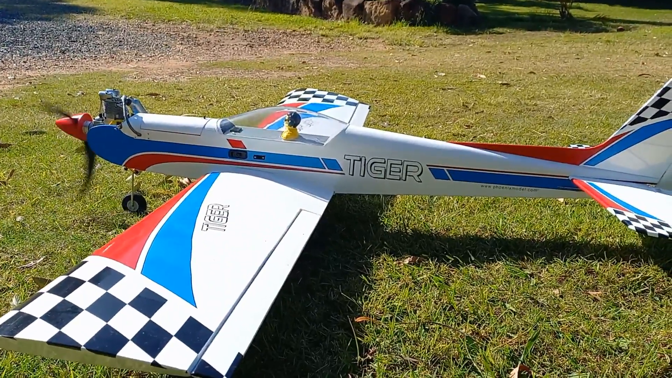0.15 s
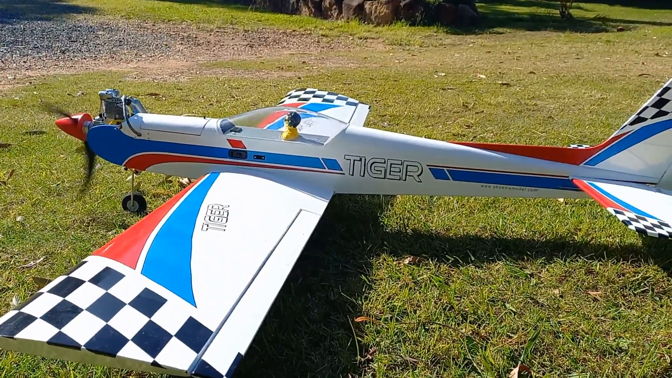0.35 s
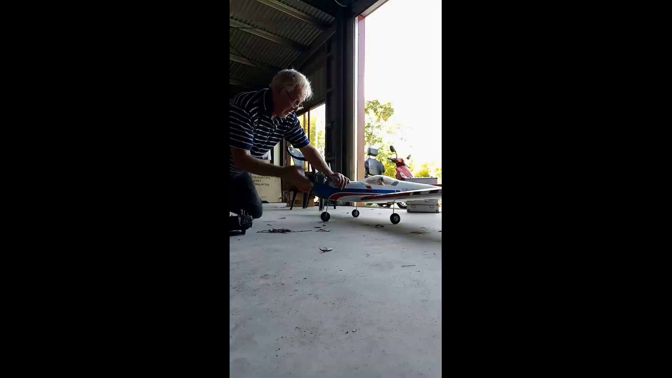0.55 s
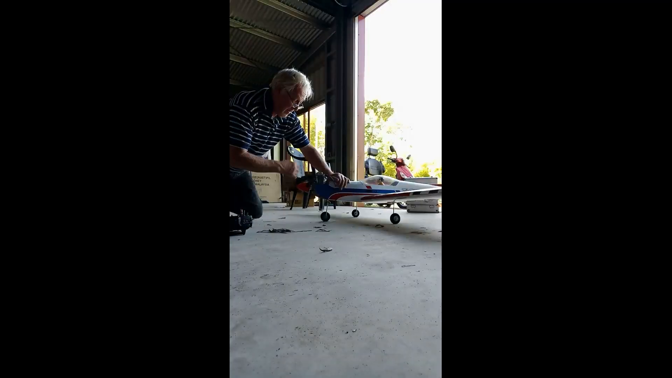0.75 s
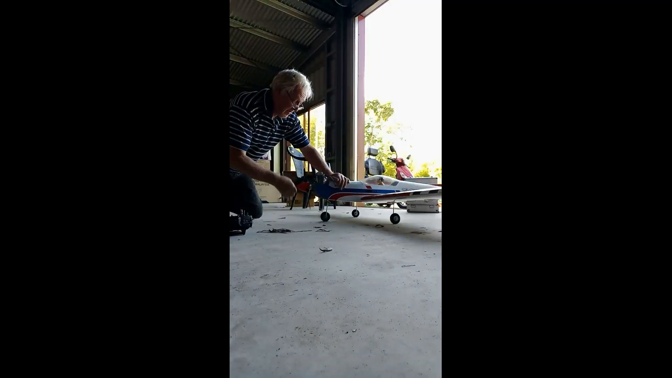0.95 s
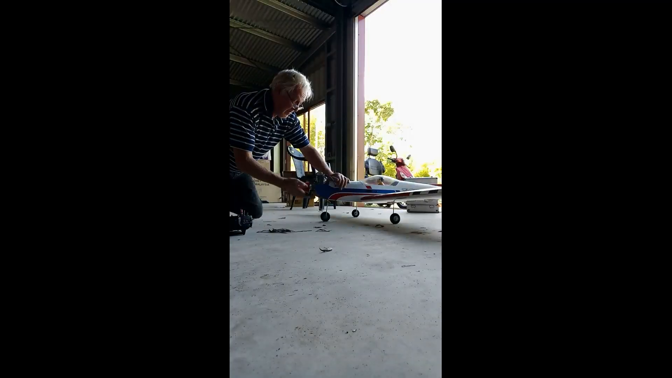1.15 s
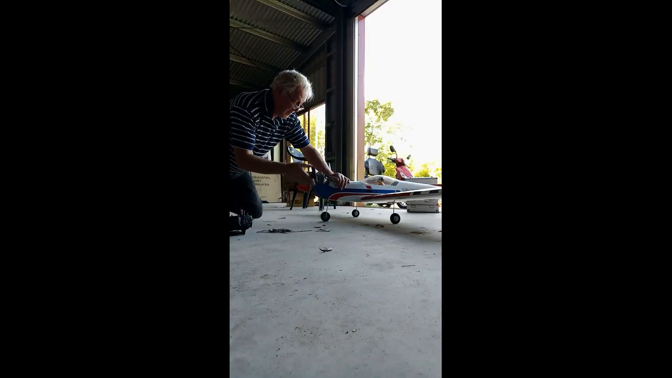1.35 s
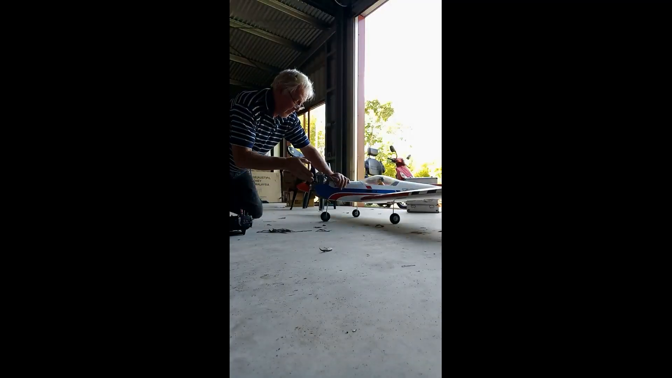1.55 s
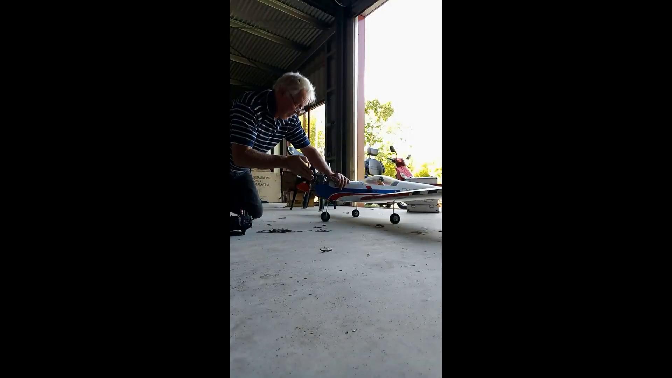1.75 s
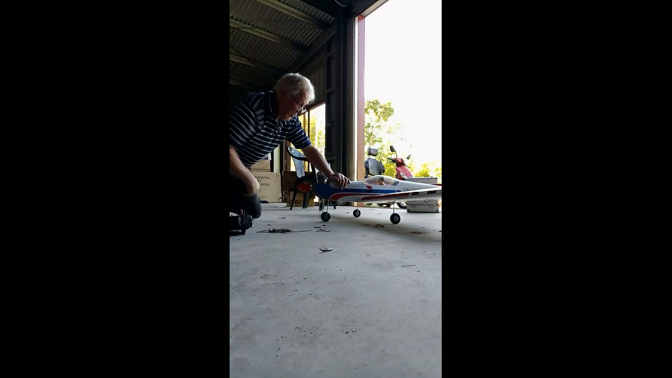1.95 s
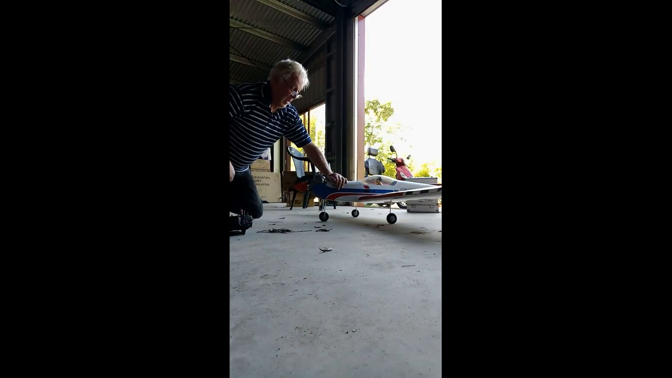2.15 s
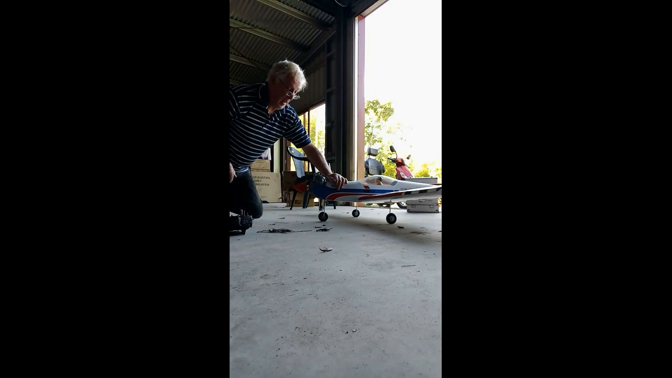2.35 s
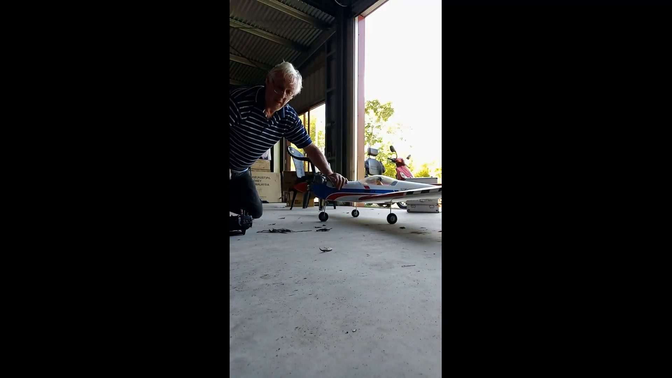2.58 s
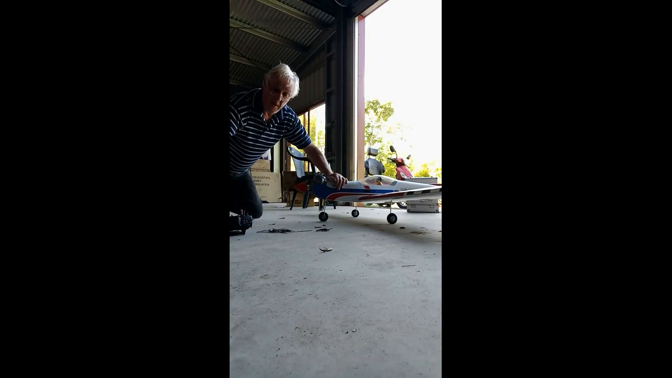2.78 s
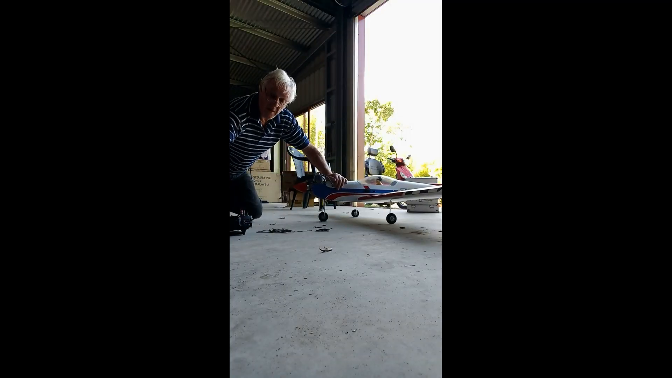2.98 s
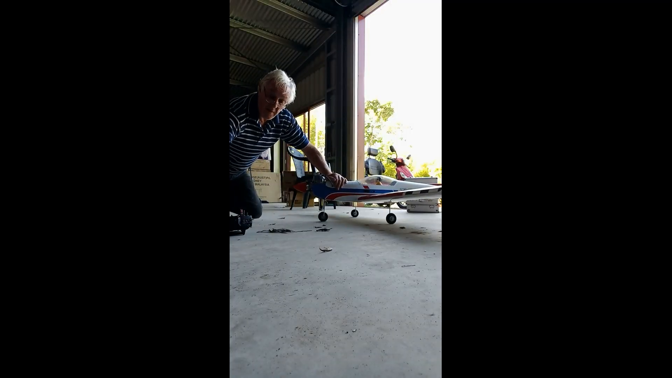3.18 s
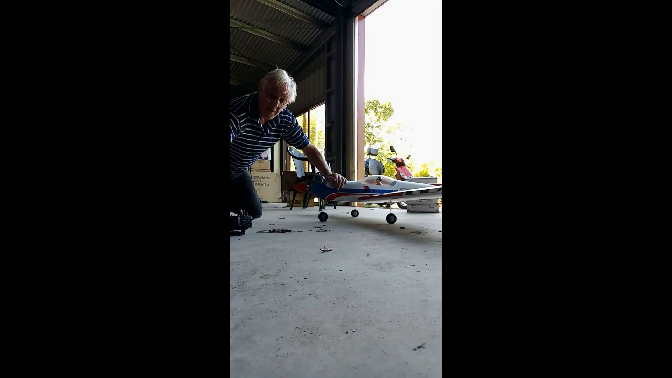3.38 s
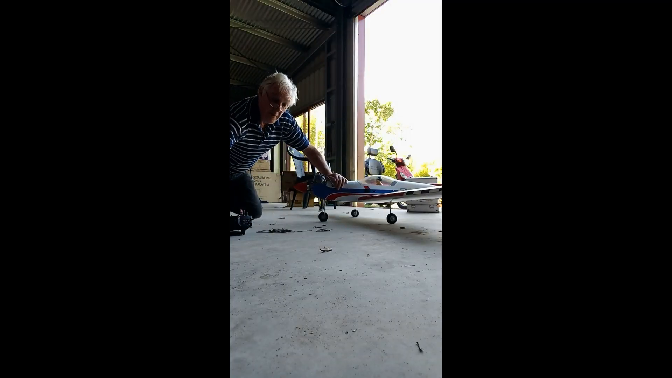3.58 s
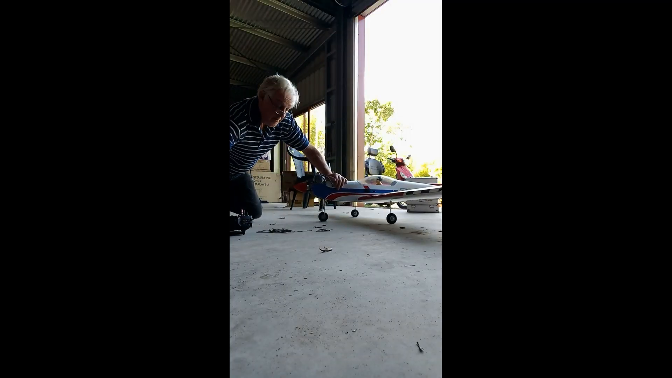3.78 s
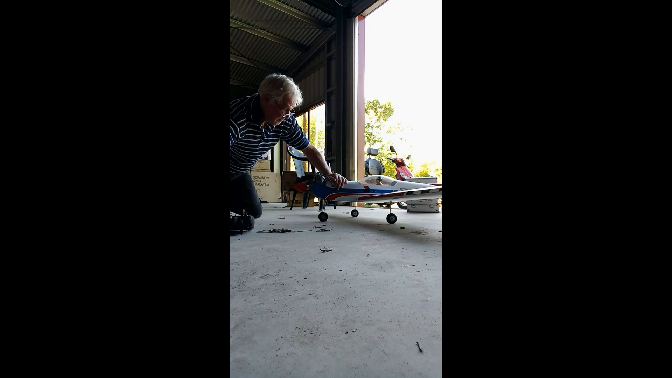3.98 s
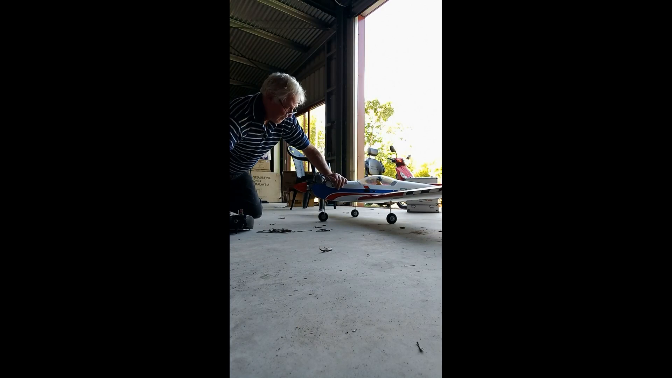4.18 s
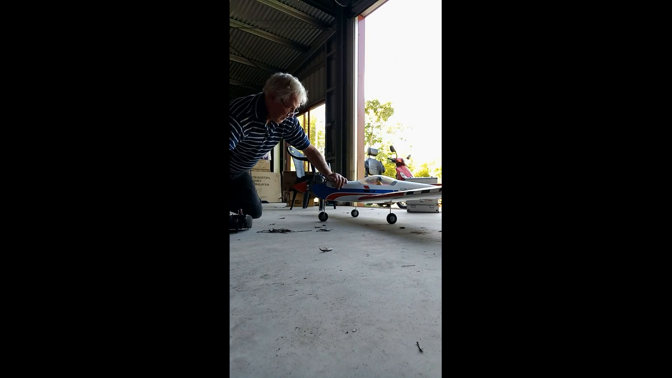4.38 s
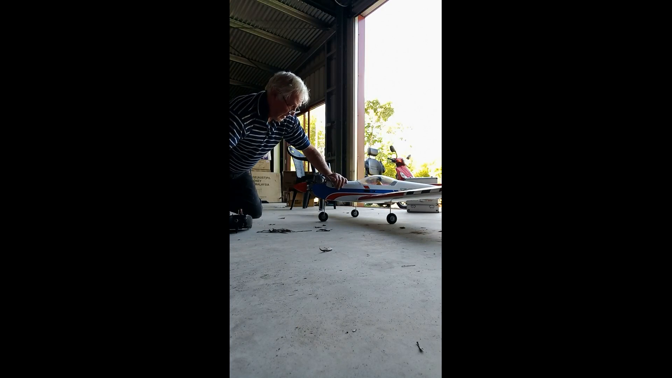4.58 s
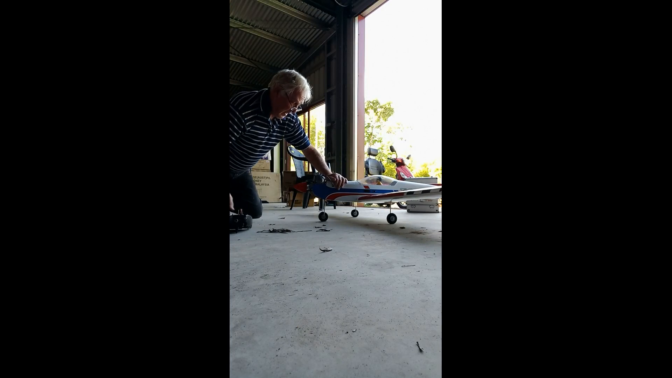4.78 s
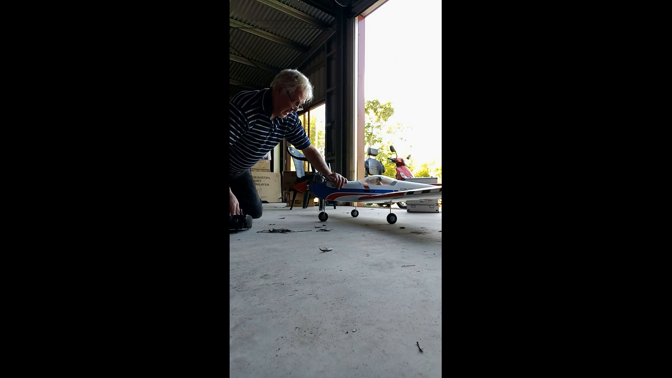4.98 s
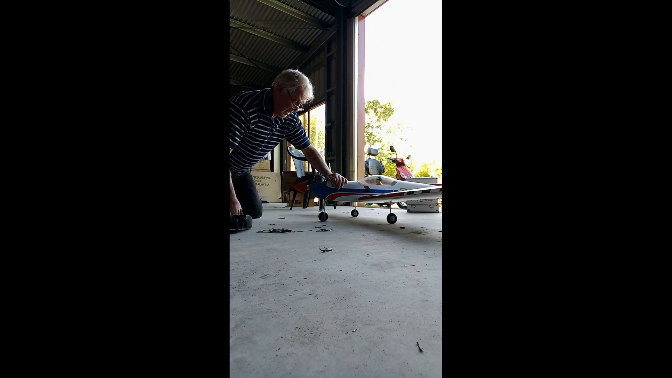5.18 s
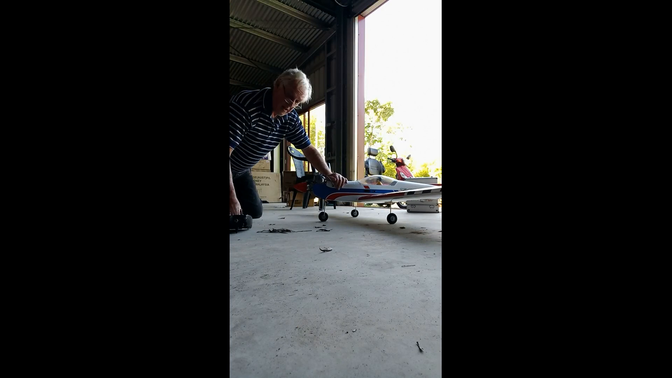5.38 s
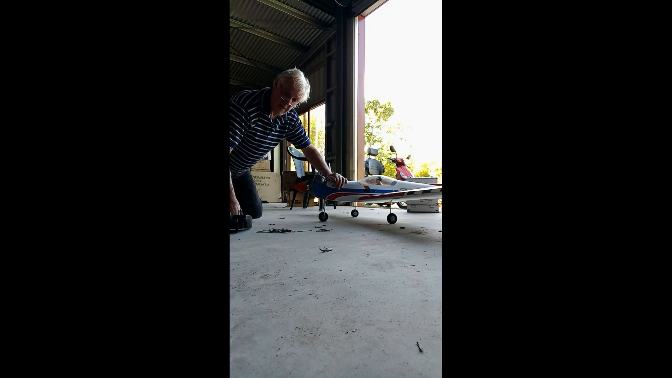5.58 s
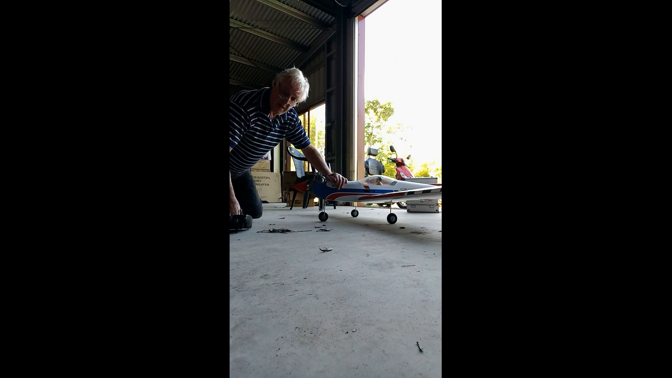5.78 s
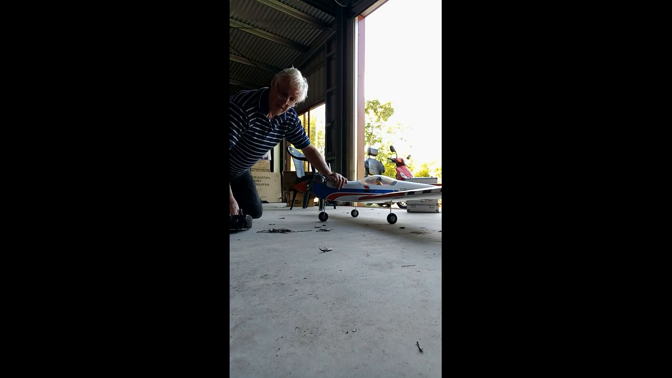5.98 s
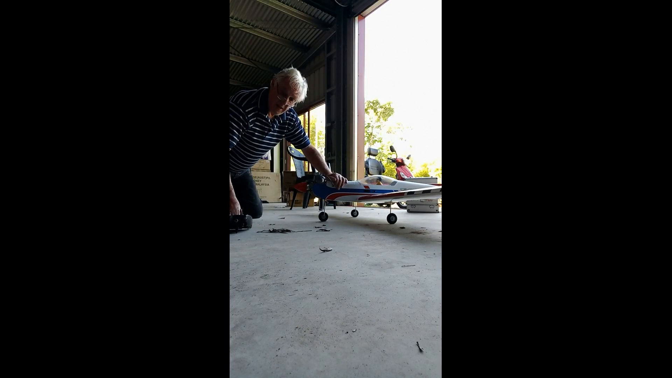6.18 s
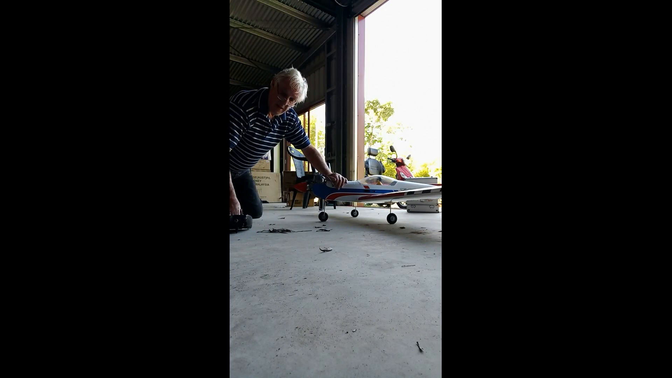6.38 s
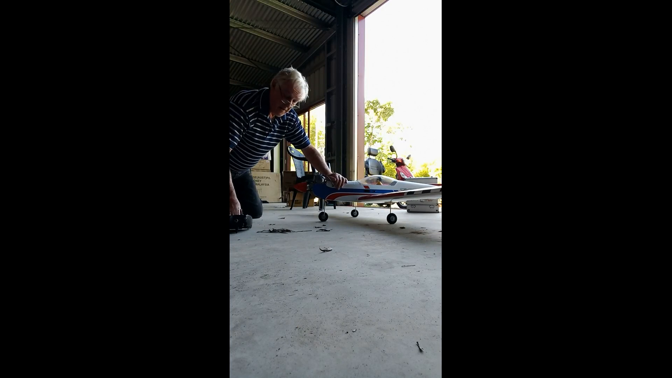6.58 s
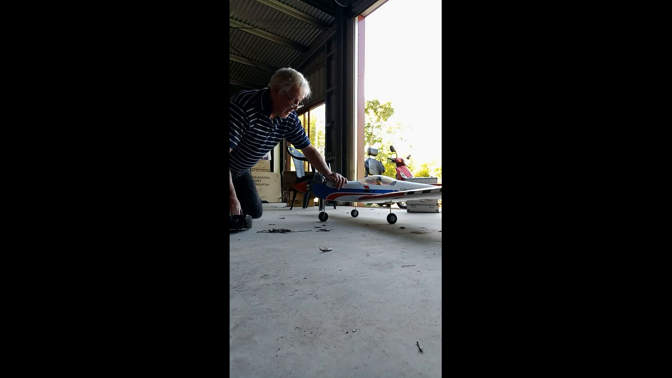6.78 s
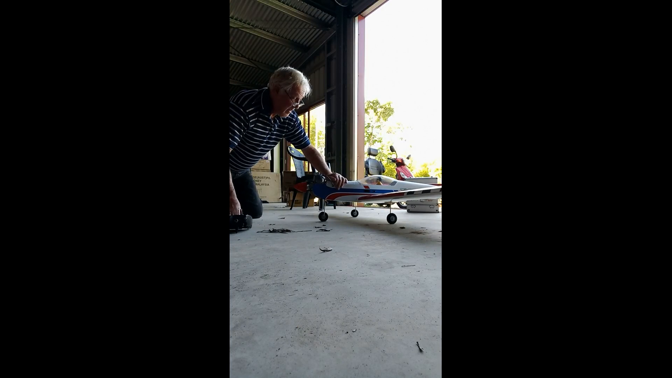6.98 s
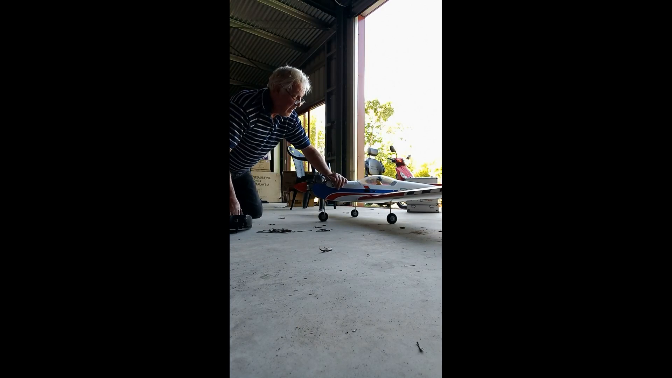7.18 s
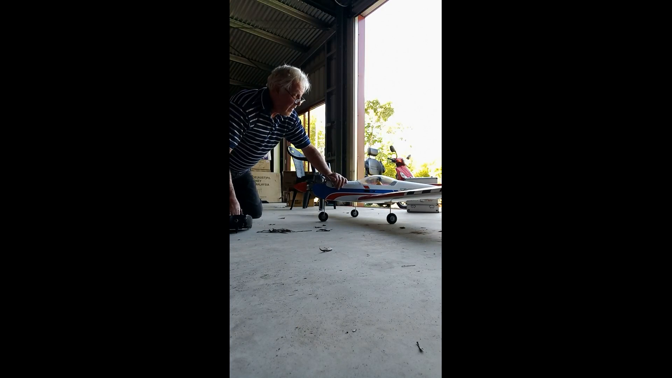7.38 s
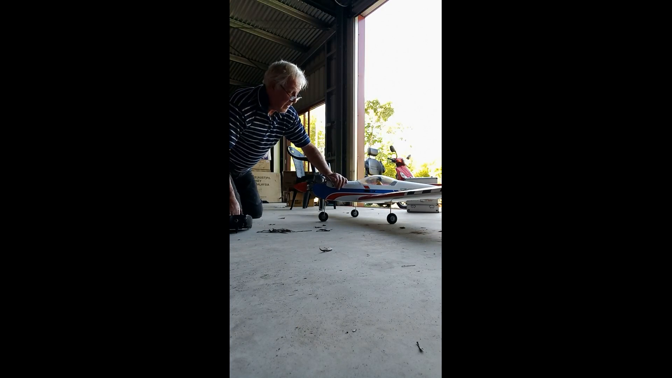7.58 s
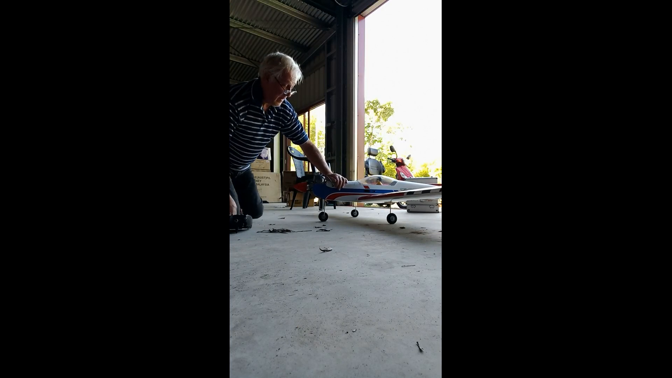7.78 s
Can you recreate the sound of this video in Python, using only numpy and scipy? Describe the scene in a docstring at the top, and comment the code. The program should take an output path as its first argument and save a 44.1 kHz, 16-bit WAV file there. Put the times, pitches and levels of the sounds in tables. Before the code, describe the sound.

Half a second of putting model engine outdoors, faint handling in a shed, then a flick start, buzzing high-speed drone and a long lumpy rasping idle.

```python
"""Model airplane engine on a lawn, then in a shed

A single-cylinder two-stroke idles on a lawn. Then, in an open shed, hands rustle at the propeller and
flick it: the engine catches, races, and sinks to an idle where it fires on every other turn.
Each firing is a decaying noise crack at the port and a puff from the silencer with ringing modes, over
propeller rasp; racing, the puffs give way to a drone of crank-rate multiples. A tick hits the microphone."""
import sys
import numpy as np
from scipy import signal
from scipy.fft import rfft, irfft, next_fast_len
from scipy.io import wavfile
from scipy.ndimage import uniform_filter1d, minimum_filter1d

SR = 44100
rng = np.random.default_rng(int(sys.argv[2]) if len(sys.argv) > 2 else 0)


def digitize_waveform(pressure):
    """Quantize a signal to 16-bit integers and store it at the path in sys.argv[1].

    Rows of a 2-D input are taken as channels; values are limited to [-1, 1].
    """
    field = np.atleast_2d(pressure).T
    bounded = np.clip(field, -1, 1)
    quanta = np.round(bounded * 32767).astype(np.int16)
    wavfile.write(sys.argv[1], SR, quanta)


N = 345730
TIME = np.arange(N) / SR  # s

# Spans in which every turn fires. Each row: start in seconds, end in seconds.
CLEAN_RUNNING = [(1.9, 3.6), (5.1, 5.17), (5.47, 5.61)]
# How hard the engine runs in the shed. Each row: time in seconds, effort in dB, to be read against idle.
SHED_EFFORT = [(2.1, -26.5), (3.29, -27.5), (3.67, -33), (4.43, -34.5), (4.96, -29), (7.8, -28.5)]
IDLE_EFFORT_DB = -29
# The drone at speed. Each row: multiple of the crank rate, relative level in dB.
DRONE = [(2, -28), (3, -20), (4, 3.5), (5, -4), (6, -8), (7, -7.5), (8, -11), (9, -9), (10, -21), (11, -22),
         (12, -19), (13, -13), (14, -17), (15, -20), (16, -21), (17, -18), (18, -19), (19, -27), (20, -18)]
# The exhaust stays weak until the engine has caught; the change takes CATCH_S.
CAUGHT_S, CATCH_S = 2.015, 0.01


def from_db(db):
    """Decibels to gain."""
    return 10 ** (np.asarray(db) / 20)


def in_time(rows):
    """Each column of a timed curve, drawn straight between its rows, at every sample."""
    s, *columns = np.transpose(rows)
    return [np.interp(TIME, s, column) for column in columns]


def at_hz(points, hz):
    """Read a spectrum on a log-frequency axis."""
    f, value = np.transpose(points)
    return np.interp(np.log(hz + 1), np.log(f), value)


def band(x, low_hz, high_hz, order=4):
    """Band-pass."""
    edges = np.clip([low_hz, high_hz], 10, .45 * SR)
    return signal.sosfilt(signal.butter(order, edges, "band", fs=SR, output="sos"), x + 1e-18)


def evened(x, running=0.78):
    """Hold the slow rms of the centre signal at the value of running; single pulses keep their shape."""
    running = running * np.ones(N)

    def smooth(v):
        return uniform_filter1d(uniform_filter1d(v, size=6600), size=6600)

    centre = np.atleast_2d(x).mean(0)
    power = smooth(centre ** 2 * running) / (np.abs(smooth(running)) + 1e-9)
    return x * running / np.sqrt(np.abs(power) + 1e-12)


def noise(colour, balance=((1, 0),)):
    """Coloured stereo noise, alike in the bass and mostly unrelated in the treble; centre rms 1."""
    # Each row: frequency in Hz, left-right likeness (clipped to at most 1).
    likeness = [(200, 2.1), (700, 0.53), (1400, 0.25), (2800, 0.26), (5000, 0), (15000, 0.17)]
    size = next_fast_len(N)
    hz = np.arange(size // 2 + 1) * SR / size
    mid, side = rfft(rng.standard_normal((2, size)))
    alike = np.clip(at_hz(likeness, hz), -1, 1)
    sides = np.array([[1], [-1]])  # left, right
    pair = mid + np.sqrt((1 - alike) / (1.001 + alike)) * side * sides
    shape_db = at_hz(colour, hz) + sides * at_hz(balance, hz) / 2
    x = irfft(pair * from_db(shape_db), size)[:, :N]
    return x / x.mean(0).std()


def clicks(times, sizes):
    """One impulse at each time."""
    at = np.round(times * SR).astype(int)
    inside = (at >= 0) & (at < N)
    return np.bincount(at[inside], sizes[inside], N)


def ring(x, hz, t60):
    """A resonance: a unit click sets a sine ringing from height 1, 60 dB down after t60 seconds."""
    r, w = from_db(-60 / (t60 * SR)), 2 * np.pi * hz / SR
    return signal.lfilter([0, np.sin(w)], [1, -2 * r * np.cos(w), r * r], x + 1e-18)


def fade(x, decay_s):
    """Each click starts an exponential decay."""
    return signal.lfilter([1], [1, -np.exp(-1 / (decay_s * SR))], x + 1e-18)


def bursts(rows):
    """Envelope of sudden, exponentially decaying events."""
    return sum(from_db(db) * fade(clicks(np.array([s]), np.ones(1)), decay) for s, db, decay in rows)


def scatter(x, t60):
    """A dense stereo tail of reflections: decaying noise of about unit energy, half a second long."""
    t = TIME[:SR // 2]
    grains = rng.standard_normal(len(t)) + .5 * rng.standard_normal((2, len(t)))
    tail = grains * from_db(-60 * t / t60)
    return signal.fftconvolve(x[None], tail / np.sqrt(np.sum(tail ** 2) / 2), axes=1)[:, :N]


def still_air():
    """The quiet air of the shed: faint, bass-heavy noise."""
    # Each row: frequency in Hz, relative level in dB.
    air_colour = [(18, -54.5), (30, -27.5), (71, -4), (139, 2), (404, -9), (837, -16.5), (2310, -21),
                  (3410, -25), (15000, -27)]
    return from_db(-73.5) * noise(air_colour)


def microphone_tick():
    """Something small hits the microphone's right port: a noisy tick and a low, ringing thud."""
    hit = clicks(np.array([2.6725]), np.ones(1))  # s
    tick = fade(hit, 0.0011) * (2.34 + 0.5 * rng.standard_normal(N)) - 1.7 * ring(hit, 93, 0.043)
    return tick * from_db([[-17], [0]])  # left, right


def stroke(start_s, length_s):
    """Envelope of a hand's stroke: it comes on, holds and dies away."""
    attack_s, decay_s = 0.019, 0.049
    onset = np.clip((TIME - start_s) / attack_s, 0, 1)
    return onset * np.exp(-np.maximum(TIME - start_s - length_s, 0) / decay_s)


def hands(rustle, slips):
    """Skin bumps and rubs on the airframe, small knocks add to it, and panels sing along."""
    # A hand grips or slides. Each row: start in seconds, length in seconds, relative bumping level in dB,
    # relative rubbing level in dB.
    hand_strokes = [(0.492, 0.41, -78, -65), (.61, 0.14, -63, -75), (0.68, 0.042, -71, -63),
                    (.78, .04, -80, -71), (.88, .03, -68, -82), (1.164, 0.085, -64, -73),
                    (1.3, .16, -81, -77), (1.524, 0.034, -69, -80)]
    # Propeller and airframe. Each row: start in seconds, relative level in dB, decay in seconds, lowest Hz.
    knocks = [(.664, -45, .003, 2200), (.709, -48, .007, 1900), (.838, -56, .003, 900),
              (.898, -61, 0.0036, 900), (1.176, -63, .014, 420), (1.531, -71, .016, 350),
              (1.849, -55, 0.086, 99), (1.873, -36, 0.41, 98)]
    # Each row: low edge in Hz, high edge in Hz, relative level in dB.
    panels = [(1500, 1600, 4), (2260, 2350, 5)]
    bump = sum(from_db(db) * stroke(s, length) for s, length, db, _ in hand_strokes)
    rub = sum(from_db(db) * stroke(s, length) for s, length, _, db in hand_strokes)
    touch = bump * evened(band(rustle, 110, 500)) + rub * slips * evened(band(rustle, 1080, 14500))
    for s, db, decay, low in knocks:
        touch = touch + bursts([(s, db, decay)]) * band(rustle, low, 15000, order=2)
    return touch + sum(from_db(db) * band(touch, low, high, order=1) for low, high, db in panels) / 2


def wheeze(rustle, slips):
    """The piston drawn over by hand: a gliding, fluttering whistle in a rush of air, with a shed tail."""
    # Each row: time in seconds, whistle pitch in Hz, relative level in dB.
    wheeze_curve = [(.77, 1126, -73), (.79, 1234, -53), (.81, 1342, -50), (.825, 1370, -51),
                    (.85, 1480, -68)]
    hz, level_db = in_time(wheeze_curve)
    flutter = 1 + .8 * evened(band(rng.standard_normal((2, N)), 10, 160, order=1))
    whistle = from_db(-3) * flutter * np.sin(2 * np.pi * np.cumsum(hz) / SR)
    air_rush = slips * evened(band(rustle, 800, 3300))
    sounding = (TIME > wheeze_curve[0][0]) * (TIME < wheeze_curve[-1][0])
    direct = from_db(level_db) * (whistle + air_rush) * sounding
    return direct + from_db(-11) * scatter(direct.mean(0), t60=.5)


def scrape(rustle):
    """A sliding hand sets one panel singing faintly: a narrow noise band that fades out by 0.85 s."""
    return from_db(-70) * evened(band(rustle, 1500, 1600, order=2)) * np.clip((.85 - TIME) / .2, 0, 1)


def handling():
    """Hands at the propeller and airframe, over the shed's still air, from the start of the shed on."""
    # Each row: frequency in Hz, relative level in dB.
    rustle_colour = [(100, -18), (240, -4), (450, -6), (700, -5), (1200, -12), (1530, -11.5), (1800, -14),
                     (2250, -13), (3000, -18), (4000, -18), (6000, -22), (7000, -35), (15000, -28)]
    rustle = noise(rustle_colour)
    # skin sticks and slips on the covering
    slips = from_db(2 * evened(band(rng.standard_normal(N), 15, 120, order=2)) - 2)
    close_by = hands(rustle, slips) + wheeze(rustle, slips) + scrape(rustle)
    return (close_by + still_air()) * (TIME > .503)


def crank(speed):
    """Times at which the exhaust port opens, once a turn, and whether each turn fires."""
    s, rpm = np.transpose(speed)
    t = np.arange(s[0], s[-1], 1 / SR)
    turns = np.cumsum(np.interp(t, s, rpm)) / 60 / SR
    times = np.interp(np.arange(int(turns[-1]) + 1), turns, t)
    fired = [True]
    for now in times[1:]:
        # at idle a whole turn is needed to flush out the burnt gas
        fired.append(not fired[-1] or any(a < now < b for a, b in CLEAN_RUNNING))
    return times, np.array(fired)


def puff_train(times, fired, shape, rings, uneven_db, outlet_hz):
    """Each turn knocks at the port, pushes out a slug of gas and leaves the silencer and airframe ringing."""
    port_s, port_width_s, port_db, slug_s, slug_width_s, unfired_late_s, unfired_db = shape
    t = TIME[:SR // 3]
    slug = (t - slug_s) / slug_width_s
    port_knock = from_db(port_db) * np.exp(-((t - port_s) / port_width_s) ** 2 / 2)
    puff = -slug * np.exp(-slug ** 2 / 2) - port_knock
    # the rings start at the slug's peak
    kick = clicks(np.array([slug_s - slug_width_s]), np.ones(1))[:len(t)]
    puff = puff + sum(from_db(db) * ring(kick, hz, t60) for hz, db, t60 in rings)
    strength = from_db(unfired_db * ~fired + uneven_db * rng.standard_normal(len(times)))
    x = signal.oaconvolve(clicks(times + unfired_late_s * ~fired, strength), puff)[:N]
    return signal.sosfilt(signal.butter(2, outlet_hz, "high", fs=SR, output="sos"), x)


def rush(times, fired, crack_db, crack_s, pump_db, clatter_db, tail_db):
    """Envelope of the noise: steady propeller wash, a crack per firing, gasps each turn, metal clatter."""
    crack_uneven, unfired_uneven, gasp_uneven = rng.standard_normal((len(times), 3)).T
    cracks = clicks(times - .0004, fired * from_db(.5 * crack_uneven))
    gasps = clicks(times - .0015, ~fired * from_db(unfired_uneven + 5))
    gasps = gasps + clicks(times + .0095, from_db(gasp_uneven + 4))
    # loose metal clatters at random, about 260 times a second
    rattles = (rng.random(N) < 260 / SR) * from_db(np.minimum(rng.exponential(1, N), 2))
    parts = [from_db(crack_db) * fade(cracks, crack_s),
             from_db(tail_db) * fade(cracks, 0.059),
             from_db(pump_db) * fade(gasps, 0.01),
             from_db(clatter_db) * fade(rattles, 0.00099)]
    return np.sqrt(1 + sum(part ** 2 for part in parts))  # the 1 is the steady wash


def bark(times, fired, air, decay_s, unfired):
    """The airframe answers each turn with the same short, bright ring; centre rms 1 over the run."""
    # Bright resonances. Each row: frequency in Hz, width in Hz, relative level in dB.
    bark_peaks = [(2300, 370, 5), (3870, 190, -0.5), (5450, 210, 8.5)]
    answer = air[:, :SR // 20] * np.exp(-TIME[:SR // 20] / decay_s)
    peaks = sum(from_db(db) * band(answer, hz - width / 2, hz + width / 2, order=1)
                for hz, width, db in bark_peaks)
    strikes = clicks(times, np.where(fired, 1, unfired))
    x = signal.oaconvolve(strikes[None], answer + peaks / 2, axes=1)[:, :N]
    return x / np.sqrt(np.sum(x.mean(0) ** 2) / ((times[-1] - times[0]) * SR))


def engine(puffs, roar, levels, running, wash_db):
    """Exhaust with wash, growl, rasp and hiss: four bands, each held at its own level."""
    low = puffs + from_db(wash_db) * evened(band(roar, 168, 420, order=2), running)
    layers = [low, band(roar, 640, 2196), band(roar, 2130, 11100), band(roar, 11560, 25000)]
    return sum(evened(x, running) * from_db(db) for x, db in zip(layers, levels))


def lawn_engine():
    """A dry, slow idle over grass: puffs from the silencer and noise shaped by each turn."""
    # Each row: time in seconds, crank speed in rpm.
    lawn_speed = [(-.009, 1426), (.468, 1440)]
    # One row: port knock delay in seconds, its width in seconds, its relative level in dB, slug delay in
    # seconds, its width in seconds, extra delay of an unfired turn in seconds, its change in dB.
    lawn_puff = (.0024, .0005, -6, .005, .00088, .0008, -10)
    # What rings on after each puff. Each row: frequency in Hz, relative level in dB, t60 in seconds.
    lawn_rings = [(150, -23, 0.08), (250, -22.5, 0.15), (315, -12, .04), (520, -26, .04), (660, -23, 0.034),
                  (865, -27, 0.08)]
    # Each row: frequency in Hz, relative level in dB.
    lawn_colour = [(290, -25), (500, -12), (729, -10), (868, -7.5), (974, -8.5), (1670, -18), (2190, -12.5),
                   (2540, -14), (3150, -15.5), (3920, -12), (7100, -19), (8960, -11.5), (10100, -24.5),
                   (13600, -22.5), (16000, -23.5)]
    # Each row: frequency in Hz, left minus right in dB.
    lawn_balance = [(60, -6), (110, 3.5), (200, -7.5), (380, 12.5), (700, 6.5), (1290, -3.5), (2380, 0.5),
                    (4400, -4.5), (8120, -3), (15000, 6.5)]
    # One row: steady levels of exhaust, growl, rasp and hiss in dB.
    lawn_levels = [-20.5, -40.5, -35, -42.5]
    times, fired = crank(lawn_speed)
    running = TIME < lawn_speed[-1][0]
    puffs = evened(puff_train(times, fired, lawn_puff, lawn_rings, uneven_db=1.1, outlet_hz=72), running)
    # the silencer's side chamber swallows a narrow band
    puffs = signal.lfilter(*signal.iirnotch(405, 3, fs=SR), puffs)
    # the hollow fuselage keeps drumming between the puffs
    puffs = puffs + from_db(-9.5) * evened(band(rng.standard_normal(N), 170, 330), running)
    air = noise(lawn_colour, lawn_balance)
    roar = air * rush(times, fired, crack_db=9.0, crack_s=.005, pump_db=-2.5, clatter_db=6, tail_db=-1.5)
    roar = roar + from_db(-5.0) * bark(times, fired, air, decay_s=0.0056, unfired=0.15)
    return engine(puffs, roar, lawn_levels, running, wash_db=-14.5)


def throttle_open():
    """One while the throttle is open, zero once it has closed."""
    closes_s, closing_s = 3.266, 0.11
    return np.clip(1 - (TIME - closes_s) / closing_s, 0, 1)


def buzz(count):
    """The drone's upper multiples and their relative levels in dB, uneven and falling with frequency."""
    first_db, db_per_octave, uneven_db = -22.5, -1, 1.5
    lowest = DRONE[-1][0] + 1
    k = np.arange(lowest, lowest + count)
    level_db = first_db + db_per_octave * np.log2(k / lowest) + uneven_db * rng.standard_normal(count)
    return list(zip(k, level_db))


def drone(times, lag_s, wobble, flutter, smear):
    """At speed the puffs merge with the propeller's blade tones into a drone with a buzzing top."""
    drone_db, upper_closed_db = -0.5, -10  # the upper tones drop when the throttle closes
    turn = np.arange(len(times))
    turns = np.interp(TIME - lag_s, times, turn + wobble * rng.standard_normal(len(times)))
    sounding = (turns > 0) & (TIME < 4)
    turns = turns[sounding]
    closed = 1 - throttle_open()[sounding]
    tones = 0
    for k, db in DRONE + buzz(count=22):
        # the upper tones arrive mostly by reflection, out of step, the highest different in each port
        diffuse = np.clip((k - 5) / 7, 0, 1)
        port_shift = 0.6 * rng.standard_normal((2, 1)) * (k > len(DRONE))
        shift = diffuse * (rng.uniform(-np.pi, np.pi) + port_shift)
        # combustion varies over a few turns: each tone wavers with it, the highest most
        shift = shift + smear * k * diffuse * np.interp(turns, turn[::2], rng.standard_normal(len(turn[::2])))
        waver = flutter * np.sqrt(k) * np.interp(turns, turn[::3], rng.standard_normal(len(turn[::3])))
        upper = np.clip((k - 4) / 2, 0, 1)
        height = from_db(drone_db + db + upper_closed_db * upper * closed) * (1 + waver)
        tones = tones + height * np.cos(2 * np.pi * k * turns + shift)
    x = np.zeros((2, N))
    x[:, sounding] = tones
    return x


def clank(times, fired):
    """Each turn strikes the silencer shell, firings hardest; its modes ring for a moment."""
    # Each row: frequency in Hz, relative level in dB, t60 in seconds.
    shell_modes = [(2170, -24, .026), (2400, -23, .022), (3870, -29, .03)]
    strike = np.where(fired, 1, from_db(-14))
    return sum(ring(clicks(times, strike * from_db(db + rng.standard_normal(len(times)))), hz, t60)
               for hz, db, t60 in shell_modes)


def snarl(air, surge):
    """Ragged resonances of the exhaust once the engine has caught and pulls up to speed."""
    # Each row: low edge in Hz, high edge in Hz, relative level in dB.
    snarl_bands = [(215, 285, -14.5), (360, 460, -16.5), (580, 1600, -25), (1440, 1960, -42)]
    caught = np.clip((TIME - CAUGHT_S) / CATCH_S + 1, 0, 1)
    resonances = sum(from_db(db) * evened(band(air, low, high, order=2)) for low, high, db in snarl_bands)
    return caught * surge * resonances


def backfires(air):
    """Two sharp reports with rounded peaks as the engine catches; each makes the airframe ring."""
    # Each row: time in seconds, relative level in dB, decay in seconds.
    reports = [(1.9045, -23, .003), (1.9612, -5.5, .005)]
    flash = bursts(reports) * band(air, 780, 15000, order=1)
    s, db, _ = np.transpose(reports)
    body = ring(clicks(s, from_db(db)), 1480, .025)
    return .6 * np.tanh(2 * (flash + .5 * body))


def shed_levels(surge):
    """Levels of exhaust, growl, rasp and hiss from the effort, the throttle and the way the engine fires."""
    # Rows for exhaust, growl, rasp and hiss. Each row: level at idle in dB, change with the throttle open
    # in dB, change in a full surge in dB.
    shed_layers = [(-20.3, 3.3, -3.7), (-31, -2, 9), (-30.5, 0.6, -0.8), (-44.3, 7.3, 1)]
    every_turn_db, catching_db = 1, -5  # exhaust: louder while every turn fires, weak until caught
    effort_db = in_time(SHED_EFFORT)[0] - IDLE_EFFORT_DB
    throttle = throttle_open()
    exhaust_db, *noise_db = [db + effort_db + open_db * throttle + surge_db * surge
                             for db, open_db, surge_db in shed_layers]
    every_turn = uniform_filter1d(sum(1. * (TIME > a) * (TIME < b) for a, b in CLEAN_RUNNING), size=2200)
    catching = np.clip((CAUGHT_S - TIME) / CATCH_S, 0, 1)
    return [exhaust_db + every_turn_db * every_turn + catching_db * catching, *noise_db]


def shed_engine():
    """Start, race and idle under a tin roof: puffs with echoes, drone, cracks, rasp and a ringing shell."""
    # The engine catches, races, then coasts to idle. Each row: time in seconds, crank speed in rpm.
    shed_speed = [(1.905, 1058), (1.96, 1059), (2.09, 1982), (2.29, 2903), (2.53, 3119), (2.87, 3217),
                  (2.98, 3139), (3.24, 3224), (3.4, 2563), (3.73, 1928), (4.1, 1747), (4.52, 1666),
                  (5.11, 1666), (5.35, 1624), (5.49, 1637), (7.01, 1565), (7.07, 1583), (7.84, 1539)]
    # One row: port knock delay in seconds, its width in seconds, its relative level in dB, slug delay in
    # seconds, its width in seconds, extra delay of an unfired turn in seconds, its change in dB.
    shed_puff = (.00083, .00026, -8, .0045, .00072, .0019, -12)
    # What rings on after each puff. Each row: frequency in Hz, relative level in dB, t60 in seconds.
    shed_rings = [(140, -25.5, .16), (201, -30, .5), (229, -32, .4), (266, -27, .14), (300, -25, 0.13),
                  (355, -19.5, 0.09), (440, -26, .15), (491.8, -21.5, 0.17), (634, -17.5, 0.08),
                  (815, -26, .08), (908, -26.5, 0.11), (1296, -25, 0.034)]
    # Reflections from floor, wall and roof. Each row: delay in seconds, relative level in dB.
    shed_echoes = [(.0075, -11), (0.0149, -11), (0.0266, -10), (.0301, -10.5), (0.04, -11.5)]
    # Each row: frequency in Hz, relative level in dB.
    shed_colour = [(500, 12.5), (700, -4.5), (900, -3), (1150, -8.5), (1450, -6.5), (1750, -11.5),
                   (2250, -8.5), (3100, -11), (3750, -9.5), (5900, -10.5), (6700, -20), (7800, -18.5),
                   (8550, -13.5), (9400, -20.5), (14400, -10.5), (16000, -18.5)]
    # Each row: frequency in Hz, left minus right in dB.
    shed_balance = [(60, -17), (92, 8), (140, 0.5), (210, -4.5), (330, 4.5), (500, 3), (770, 1), (1170, 2),
                    (1790, -5.5), (2740, -5), (4190, -8.5), (6410, -5), (9810, 6), (15000, -15.5)]
    drone_from_rpm, drone_full_rpm, drone_lag_s = 2050, 3130, .1
    full_surge_rpm_per_s = 7400
    times, fired = crank(shed_speed)
    rpm, = in_time(shed_speed)
    running = TIME >= shed_speed[0][0]
    throttle = throttle_open()
    # the drone builds up, and lingers, behind the speed
    lagged_rpm = np.interp(TIME - drone_lag_s, TIME, rpm)
    racing = np.clip((lagged_rpm - drone_from_rpm) / (drone_full_rpm - drone_from_rpm), 0, 1)
    # speeding up makes the exhaust ragged
    surge = np.clip(np.gradient(rpm) * SR / full_surge_rpm_per_s, 0, 1)

    direct = puff_train(times, fired, shed_puff, shed_rings, uneven_db=.6, outlet_hz=82)
    echoes = sum(from_db(db) * np.interp(TIME - delay, TIME, direct, left=0) for delay, db in shed_echoes)
    tail = from_db(-7.5 + 3 * surge) * scatter(direct, t60=1.0)
    puffs = evened(direct + echoes + tail, running)
    # with the throttle open the drone masks the puffs; once it closes the drone weakens
    puffs = puffs * from_db(-10 * racing * throttle)
    droning = racing * from_db(-6.5 * (1 - throttle))
    puffs = puffs + droning * drone(times, lag_s=0.00397, wobble=0.0014, flutter=0.16, smear=0.026)

    air = noise(shed_colour, shed_balance)
    # with the throttle open, the separate cracks sink into a dense rasp
    roar = air * rush(times, fired, crack_db=9.5 - 7 * throttle, crack_s=.003,
                      pump_db=-3.0, clatter_db=-3.0, tail_db=-14.5)
    roar = roar + from_db(-7.5) * (1 - racing) * bark(times, fired, air, decay_s=0.015, unfired=0.13)
    roar = roar + from_db(-1.5) * racing * bark(times, fired, air, decay_s=0.14, unfired=0.34)

    effort = from_db(in_time(SHED_EFFORT)[0] - IDLE_EFFORT_DB)
    shell = clank(times, fired) * (1 - throttle) * effort
    body = engine(puffs, roar, shed_levels(surge), running, wash_db=-9 + 5 * surge)
    return body + shell + snarl(air, surge) + backfires(air)


def scene():
    """The lawn, then the shed, with one tick on the microphone."""
    return microphone_tick() + handling() + lawn_engine() + shed_engine()


def record(dry):
    """A look-ahead limiter ducks around overloads; the top is cut."""
    over_db = np.maximum(20 * np.log10(np.abs(dry).max(0) / .93 + 1e-9), 0)
    recovery = 330 * TIME  # dB regained
    held_db = np.maximum.accumulate(over_db + recovery) - recovery
    # widen each duck to both sides, then round its edges
    duck_db = uniform_filter1d(-minimum_filter1d(-held_db, size=900), size=500)
    top_cut = signal.ellip(10, .05, 60, 15900, fs=SR, output="sos")
    return signal.sosfiltfilt(top_cut, dry * from_db(-duck_db))


dry = scene()
out = record(dry)
digitize_waveform(out)
```